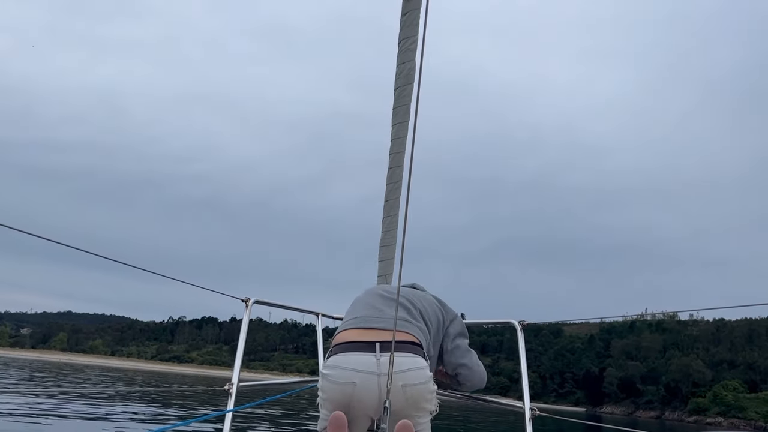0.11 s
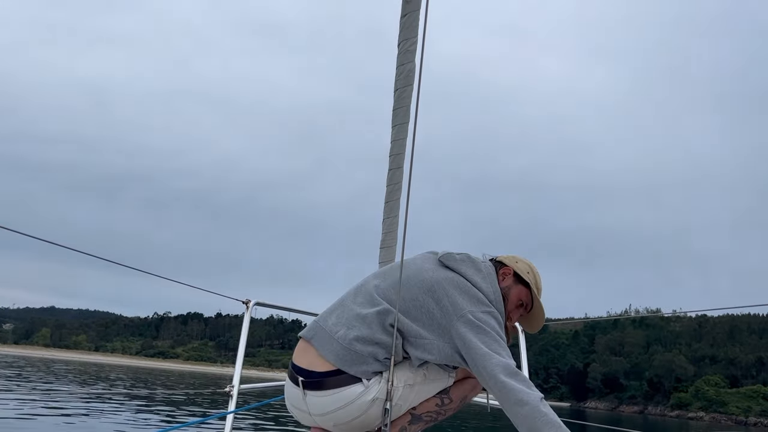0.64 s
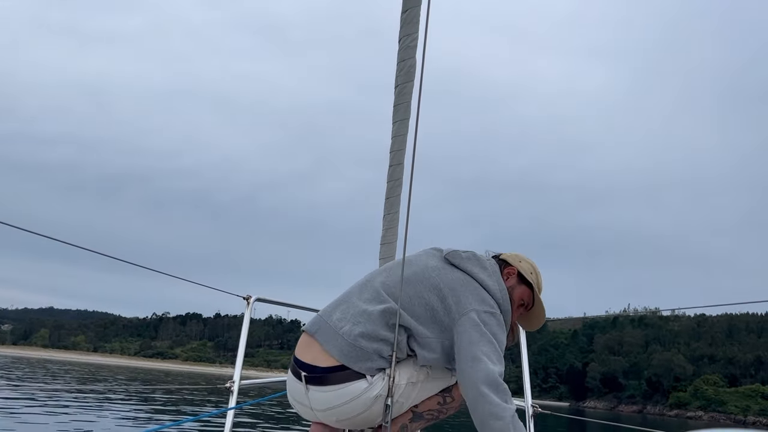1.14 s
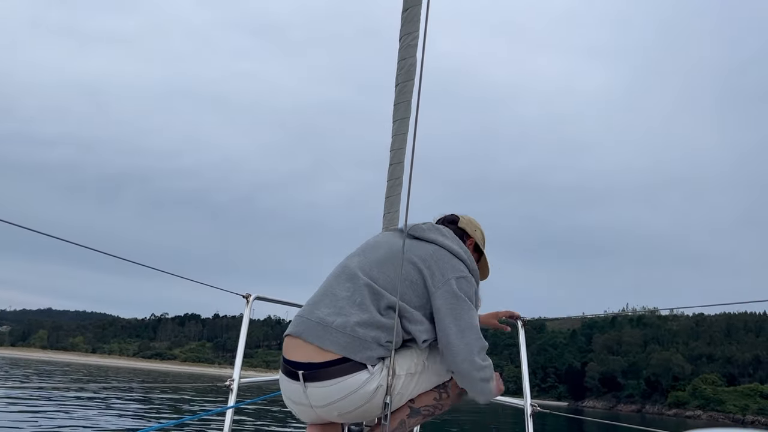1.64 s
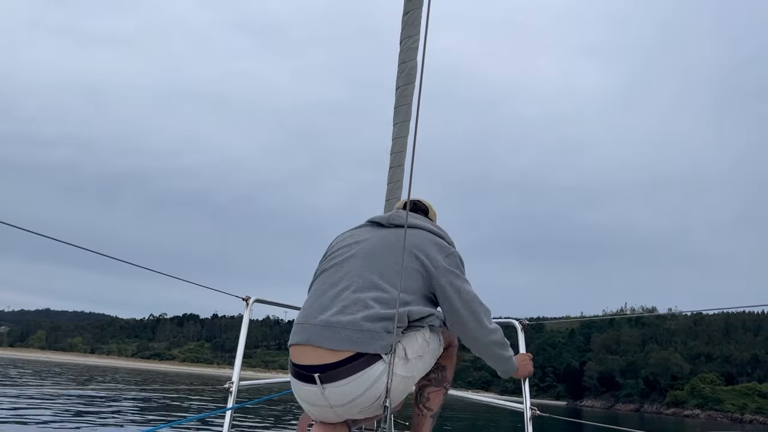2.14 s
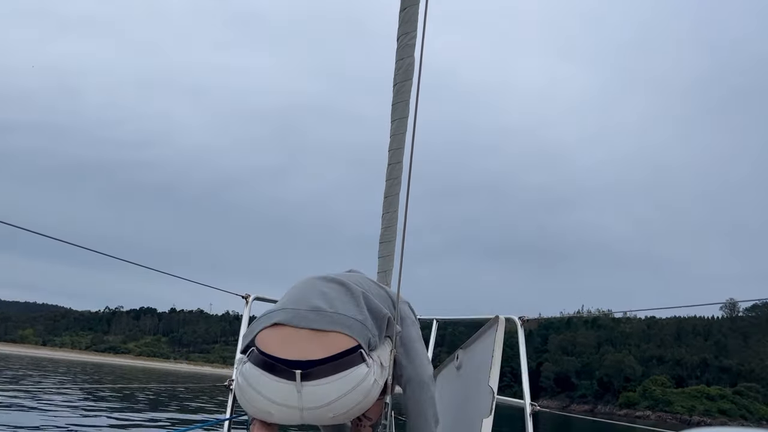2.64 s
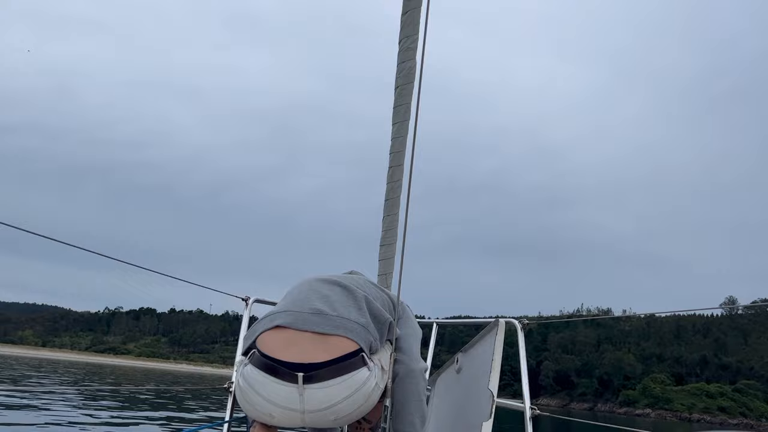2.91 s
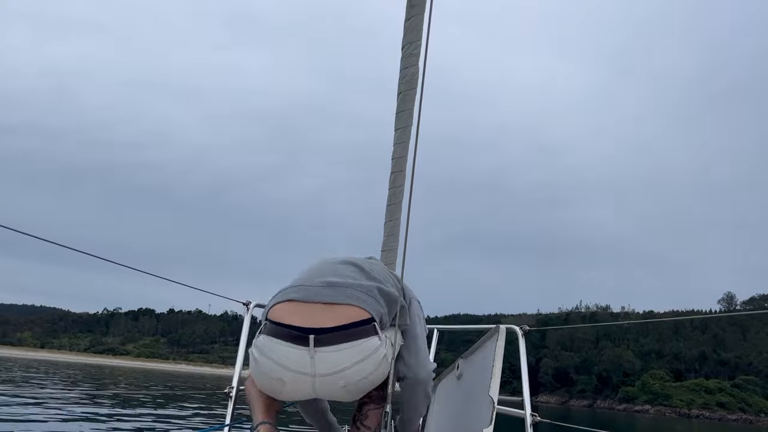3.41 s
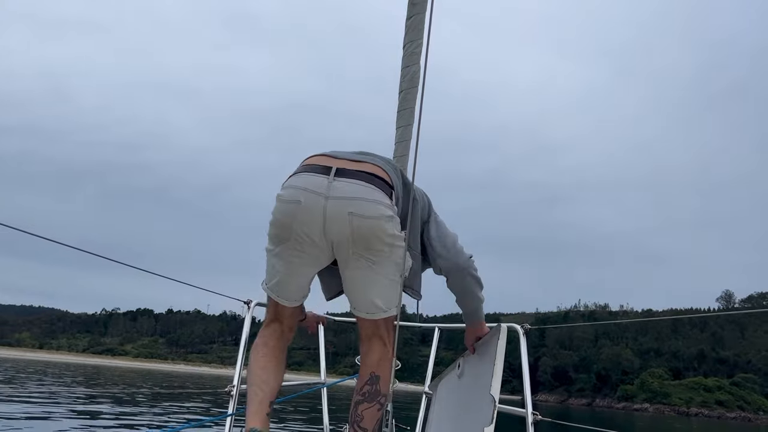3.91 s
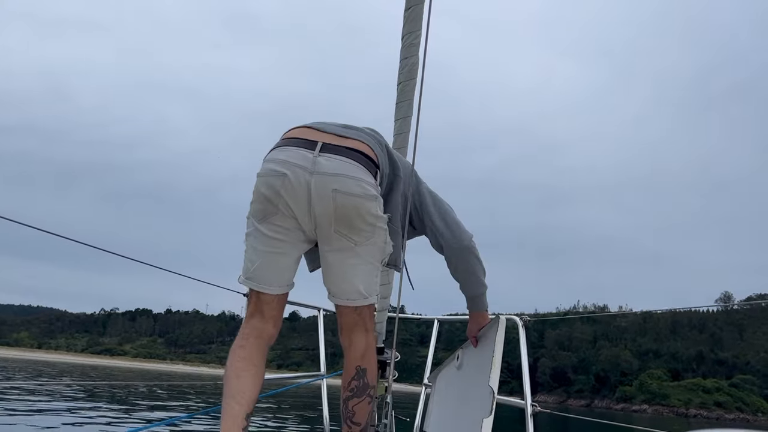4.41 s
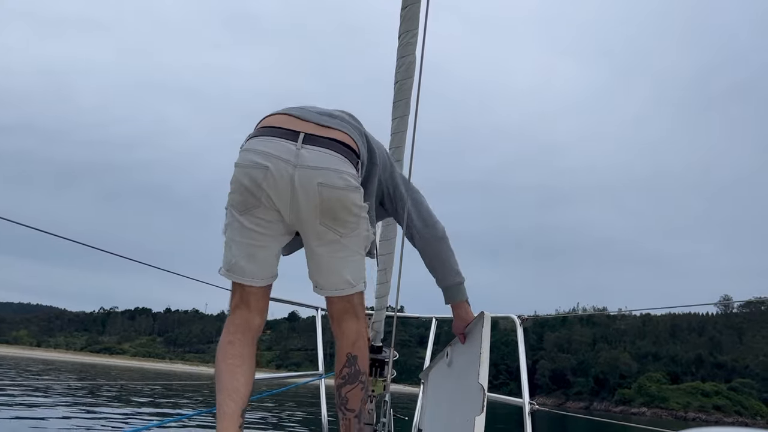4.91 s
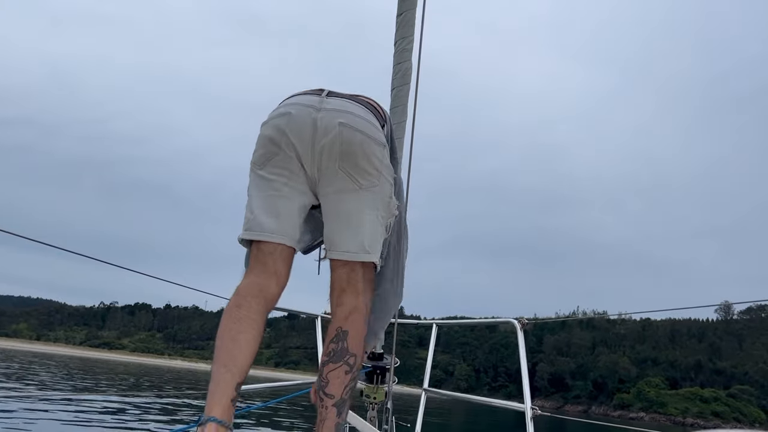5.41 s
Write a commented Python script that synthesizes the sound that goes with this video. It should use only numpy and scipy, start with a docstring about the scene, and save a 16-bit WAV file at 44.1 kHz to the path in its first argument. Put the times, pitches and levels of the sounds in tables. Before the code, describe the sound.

Quiet deck creaks and small knocks, then a loud rattling hatch bang, a sharp slap, hinge clicks and final dull bumps over low hull rumble.

```python
"""Locker hatch on a foredeck

On the foredeck of a boat at a calm anchorage someone shifts about and opens a locker hatch.
Close by, the hatch bangs and rattles, a rail rings, a hinge clicks and scrapes: rough contacts on decaying
modes. The deck knocks and creaks; gear ticks, scuffs and slaps in bursts of noise; faint tones squeak and hum.
Cloth rustles near the microphone, with a faint bright tick; around lie hull rumble, murmur and wash of shaped
noise. A faint bird on the shore is gliding whistles."""
import sys
import numpy as np
from scipy import signal
from scipy.fft import rfft, irfft
from scipy.io import wavfile
from scipy.ndimage import uniform_filter1d

SR = 44100
rng = np.random.default_rng(int(sys.argv[2]) if len(sys.argv) > 2 else 0)


def ratio_of_db(decibels):
    """Turn decibels (scalar or array-like) into linear amplitude factors; 0 dB maps to 1."""
    return 10 ** (np.asarray(decibels, float) / 20)


def inscribe(sig):
    """Save sig as 16-bit PCM at rate SR to the path in sys.argv[1].

    A 1-D sig is mono; a 2-D sig holds one channel per row.
    Samples are clipped to [-1, 1] before scaling.
    """
    pcm = np.round(np.clip(np.atleast_2d(sig).T, -1, 1) * 32767)
    wavfile.write(sys.argv[1], SR, pcm.astype(np.int16))


N = 244304
CLOCK = np.arange(N) / SR  # s

# modes of the locker hatch: f/Hz, level/dB, t60/s
HATCH_MODES = [(147, -13, 0.088), (239, -3, 0.055), (297, -5.5, 0.049), (380, -0.5, 0.046), (409, 1, 0.077),
               (510, -0.5, 0.044), (667, -3.5, 0.081), (774, 1, 0.031), (907, -2, 0.038), (1002, 2, 0.023),
               (1360, -0.5, 0.019), (1620, -8.5, 0.038), (2010, -15, 0.041)]
# phase between the two microphone ports for sound from around: f/Hz, lead of left/rad
AROUND_LEAD = [(0, 0), (260, -.2), (1120, 3.8), (2410, 5.8), (2930, 4.5), (5860, 6.7), (7580, 6.3),
               (11600, 12.3), (16700, 19.1)]


def colour(x, points):
    """Filter by a spectrum given as (f/Hz, level/dB) points, joined over log frequency."""
    hz, db = np.transpose(points)
    bins = np.log(np.maximum(np.fft.rfftfreq(x.shape[-1], 1 / SR), 1))
    return irfft(rfft(x) * ratio_of_db(np.interp(bins, np.log(hz), db)), x.shape[-1])


def band(x, lo_hz, hi_hz, order=3):
    """Band-pass scaled to a peak of 1."""
    y = signal.sosfilt(signal.butter(order, [lo_hz, hi_hz], "bandpass", fs=SR, output="sos"), x)
    return y / np.abs(y).max()


def unit(x):
    """Scale to an rms of 1."""
    return x / np.sqrt(np.mean(x ** 2))


def curve(s, db):
    """Gain over time from dB points."""
    return ratio_of_db(np.interp(CLOCK, s, db))


def walk(rate):
    """Random levels held 1 / rate s and slewed twice; spread near 1."""
    hold = int(SR / rate)
    steps = np.repeat(rng.standard_normal(N // hold + 1), hold)
    return 1.3 * uniform_filter1d(uniform_filter1d(steps, hold), hold)[:N]


def ports(x, lead):
    """Turn the phase between the two ports of the microphone, half at each."""
    hz, rad = np.transpose(lead)
    turn = np.exp(.5j * np.interp(np.fft.rfftfreq(N, 1 / SR), hz, rad))
    return irfft(rfft(x) * np.array([turn, turn.conj()]), N)


def around(points):
    """Coloured noise from all sides: one share common to both ports, one unrelated."""
    # share unrelated left and right: f/Hz, level/dB
    spread = [(60, -20.5), (150, 0.5), (400, -0.5), (1000, 7), (3000, -0.5), (8000, 2.5), (15000, -20.5)]
    common = ports(rng.standard_normal(N), AROUND_LEAD)
    unrelated = colour(rng.standard_normal((2, N)), spread)
    return unit(colour(common + unrelated, points))


def add(out, s, sound):
    """Place one sound at its time."""
    i = int(s * SR)
    piece = sound[:N - i]
    out[i:i + len(piece)] += piece


def burst(rise_ms, t60, length=.4):
    """White noise that swells and dies away."""
    t = np.arange(int(length * SR)) / SR
    swell = np.minimum(t / (max(rise_ms, .1) / 1000), 1) ** 2
    fall = np.exp(-np.log(1000) * np.maximum(t - rise_ms / 1000, 0) / max(t60, .004))
    return rng.standard_normal(len(t)) * swell * fall


def strike(modes, contact, swell_ms, scatter_db, detune=0.0086, turns=0):
    """A contact rings the modes, which take a moment to swell; each blow varies them. Peak 1."""
    hz, db, t60 = np.transpose(modes)[:, :, None]
    t = np.arange(int(.3 * SR)) / SR
    chance = rng.standard_normal((3, len(hz), 1))  # level, pitch, phase
    phase = 2 * np.pi * (hz * (1 + detune * chance[1]) * t + chance[2])
    ring = ratio_of_db(db + scatter_db * chance[0]) * np.sin(phase)
    ring = ring * np.exp(-np.log(1000) * t / np.maximum(t60, .005))
    swell_s = swell_ms / 1000 + turns / hz
    ring = (ring * (1 - np.exp(-(t / swell_s) ** 2))).sum(axis=0)
    # a yielding contact holds little treble
    soft = signal.sosfilt(signal.butter(2, 0.74 * hz.max(), fs=SR, output="sos"), contact)
    y = signal.fftconvolve(ring, soft)
    return y / np.abs(y).max()


def whistles(notes, fade_db, waver_db):
    """Near-sine notes that glide, arch in the middle and fade."""
    out = np.zeros(N)
    for s, length, from_hz, to_hz, arch_hz, db in notes:
        u = np.arange(int(length * SR)) / SR / length  # 0 to 1 through the note
        edge = np.clip(np.minimum(u, 1 - u) * length / 0.009, 0, 1)
        hz = from_hz + (to_hz - from_hz) * u + arch_hz * np.sin(np.pi * u)
        level = np.sqrt(2) * ratio_of_db(db + fade_db * u) * edge
        add(out, s, level * np.sin(2 * np.pi * np.cumsum(hz) / SR))
    return out * ratio_of_db(waver_db * walk(49))


def crack(db, treble_db, low_db, rise_ms, t60, mid_hz, treble_hz=(7000, 12000)):
    """A broad noise burst in three bands; treble and low are relative to the middle one."""
    x = burst(rise_ms, t60)
    treble = ratio_of_db(treble_db) * band(x, *treble_hz, order=2)
    low = ratio_of_db(low_db) * band(x, 260, 1000)
    return ratio_of_db(db) * (band(x, *mid_hz) + treble + low)


def hull():
    """The rumble is noise in a few low hull resonances, nearly alike at both ports."""
    # resonances: f/Hz, width/Hz, level/dB
    resonances = [(69, 24.5, -0.5), (111, 90, -11)]
    hz = np.fft.rfftfreq(N, 1 / SR)
    shape = sum(ratio_of_db(db) / (1 + ((hz - centre) / (width / 2)) ** 2) for centre, width, db in resonances)
    noise = rng.standard_normal(N) + 0.17 * rng.standard_normal((2, N))
    return unit(irfft(rfft(noise) * shape, N))


def thuds():
    """Gain that each heavy thud adds to the hull rumble: a quick swell, a slow fall."""
    # thuds at their fullest: t/s, level/dB, t60/s
    heavy = [(0.24, -41.5, 0.34), (2.048, -31.5, 0.6), (2.249, -40.5, 0.32), (2.522, -35, 0.3),
             (3.099, -34, 0.36), (5.18, -44.5, 0.93)]
    rise_s = 0.056
    gain = np.zeros(N)
    for s, db, t60 in heavy:
        swell = np.clip((CLOCK - s) / rise_s + 1, 0, 1)
        gain += ratio_of_db(db) * swell * np.exp(-np.log(1000) * np.maximum(CLOCK - s, 0) / t60)
    return gain


def anchorage():
    """Hull rumble with its thuds, a wavering deck murmur and a soft outdoor wash, all shaped noise."""
    # course of the background: t/s, murmur level/dB, wash level before its lift/dB, rumble level/dB
    course = [(0.0, -54, -56.5, -44.5), (0.62, -53.5, -59, -43.5), (1.16, -50.5, -53.5, -45.5),
              (1.56, -53.5, -57, -44), (2.5, -51, -54, -45.5), (2.849, -55, -63, -50.5),
              (4.0, -55.5, -60.5, -48), (4.9, -54, -61, -52), (5.54, -53, -60.5, -46)]
    # spectrum of the deck murmur: f/Hz, level/dB per Hz
    murmur_spectrum = [(80, -16), (120, -5), (190, 0.5), (300, -9), (500, -26), (800, -51.5)]
    # spectrum of the outdoor wash: f/Hz, level/dB per Hz
    wash_spectrum = [(150, -40.5), (250, -5), (360, -6.5), (795, -12.5), (3120, -35.5), (4650, -47),
                     (16000, -63)]
    s, murmur_db, wash_db, rumble_db = np.transpose(course)
    rumble = hull() * (curve(s, rumble_db) + thuds())
    murmur = around(murmur_spectrum) * curve(s, murmur_db) * ratio_of_db(3.9 * walk(22))
    wash_lift = ratio_of_db(0.26 * walk(2.1) + 4.5)
    wash = around(wash_spectrum) * curve(s, wash_db) * wash_lift
    return rumble + murmur + wash


def bird():
    """Thin gliding whistles from the shore, blurred by echoes over the water."""
    # notes: start t/s, length/s, first f/Hz, last f/Hz, arch/Hz, level at the start before wavering/dB
    notes = [(.994, .048, 4050, 3600, 800, -65), (1.045, .1, 3400, 3400, 50, -70),
             (1.21, .045, 4200, 3600, 520, -67), (1.256, .048, 3300, 3450, -80, -65),
             (2.815, .055, 3770, 3680, 0, -83), (2.895, .135, 4280, 3990, 0, -83),
             (3.3, .097, 4180, 4350, -470, -81), (3.39, .075, 4360, 4480, 0, -79),
             (3.75, .13, 3450, 3300, 0, -83)]
    song = whistles(notes, fade_db=-5.5, waver_db=2.5)
    blur = signal.fftconvolve(song, unit(burst(4, .15, 0.18)))[:N]
    return ports(song + ratio_of_db(-50) * blur, AROUND_LEAD)


def cloth():
    """Swishes of cloth near the microphone, and a faint bright tick: uneven noise that swells and fades."""
    # swishes of cloth, and a faint bright tick at 4.741 s: middle t/s, level/dB, half length/s
    rustle = [(0.1, -69, 0.015), (0.344, -66, 0.074), (0.573, -74, 0.089), (0.852, -64.5, 0.12),
              (0.966, -61, 0.028), (1.044, -60, 0.018), (1.311, -57, 0.034), (1.435, -58.5, 0.067),
              (1.64, -66.5, 0.071), (1.978, -62, 0.059), (2.07, -56, 0.053), (2.187, -39, 0.012),
              (2.238, -57, 0.032), (3.558, -62, 0.082), (3.756, -63, 0.049), (3.931, -56.5, 0.044),
              (4.065, -50.5, 0.027), (4.646, -61, 0.0075), (4.741, -55, 0.0085), (5.124, -60.5, 0.058)]
    # spectrum of the noise: f/Hz, level/dB per Hz
    fabric = [(1000, 0), (2000, 1.5), (3500, -5), (6000, -11), (8500, -15), (11500, -4.5), (14000, -8.5),
              (16000, -7)]
    swells = sum(ratio_of_db(db) * np.exp(-.5 * np.abs((CLOCK - s) / half) ** 2.6) for s, db, half in rustle)
    bed = ratio_of_db(-91.5)
    return around(fabric) * ratio_of_db(1.3 * walk(120)) * (swells + bed)


def squeaks():
    """The faint squeak of a sole and hum of a fitting are wavering, fading tones."""
    # tones: start t/s, length/s, first f/Hz, last f/Hz, arch/Hz, level at the start before wavering/dB
    tones = [(1.465, 0.039, 1470, 1850, 0, -65), (4.565, 0.19, 770, 774, 0, -63.5)]
    return whistles(tones, fade_db=-12.0, waver_db=6.5)


def deck(out):
    """Knees, feet and gear bump the deck, which answers with short hollow notes, creaks and groans."""
    # dull knocks: t/s, peak/dB, main pitch f/Hz
    knocks = [(0.163, -39.5, 326), (0.205, -36.5, 316), (0.235, -32, 130), (1.225, -32, 196),
              (2.017, -32, 332), (2.042, -23, 134.5), (2.093, -30, 122), (3.08, -18.5, 417),
              (3.507, -32.5, 253.4), (3.536, -33.5, 357), (5.207, -28.5, 346), (5.244, -36.5, 131.6),
              (5.307, -31.5, 331), (5.364, -39, 162.5)]
    # modes of the deck: ratio to the main pitch, level/dB, t60/s
    deck_modes = [(0.549, -7, 0.04), (1.002, 1.5, 0.038), (1.201, -11, 0.021), (1.8, -6, 0.035),
                  (2.9, -22, 0.021)]
    # creaks under shifting weight, slip by slip: t/s, peak/dB
    creaks = [(1.025, -31), (1.163, -31.5), (1.189, -28.5), (1.215, -28.5), (1.238, -50), (1.266, -34),
              (1.299, -26.5), (1.323, -38), (1.367, -33.5), (1.381, -30.5)]
    # groans while weight rolls over: start t/s, length/s, peak/dB
    groans = [(.925, 0.152, -34), (1.155, 0.29, -42.5)]
    # dull shuffles of feet: t/s, peak/dB, rise/ms
    shuffles = [(1.73, -38, 24), (2.14, -26, 9.9), (2.157, -29.5, 11)]
    slips = [(s, db, 326 * (1 + 0.023 * rng.standard_normal())) for s, db in creaks]
    # a slip is soft and rings the lowest modes only
    for blows, body in ((knocks, deck_modes), (slips, deck_modes[:3])):
        for s, db, hz in blows:
            modes = [(ratio * hz, mode_db, t60) for ratio, mode_db, t60 in body]
            # the push lasts half a period of the note, the swell about one
            push = np.hanning(int(SR / hz / 2))
            add(out, s, ratio_of_db(db) * strike(modes, push, 1100 / hz, 0.69))
    for s, length, db in groans:
        rub = rng.standard_normal(N)[:int(length * SR)]
        # silence after the rub lets the band ring out
        rub_and_rest = np.r_[rub * np.hanning(len(rub)) ** .5, 0 * rub]
        add(out, s, ratio_of_db(db) * band(rub_and_rest, 200, 462, order=2))
    for s, db, rise_ms in shuffles:
        add(out, s, ratio_of_db(db) * band(burst(rise_ms, t60=0.066), 200, 610, order=2))


def gear(out):
    """Hard ticks, short scuffs, one longer-tailed tick and one sharp slap are noise bursts, bright or dull."""
    # ticks: t/s, peak of the middle band/dB, treble/dB, low/dB
    ticks = [(0.64, -45, -36, 13), (0.991, -53, 0, -4), (1.378, -54, -6, 22), (2, -47, -7, 8),
             (2.018, -40, -3, 7.5), (2.031, -31, 2.5, -2.5), (2.431, -45, -21, -4),
             (3.4965, -26.5, -44, -4), (3.659, -48, -25, 0), (5.112, -41, -27, -5), (5.205, -48, -20, 14),
             (5.223, -32, -14, -12)]
    # scuffs, and one hard tick with a longer tail (5.408 s): t/s, peak of the middle band/dB, treble/dB,
    # low/dB, rise/ms
    scuffs_and_tick = [(2.175, -29, -15, -0.5, 6.4), (3.037, -48, -40, 7.5, 14), (3.698, -52, -8, -27, 12),
                       (5.129, -46, -17, -1, 46), (5.408, -33, -10.5, -1, 0.72)]
    # slap in its touch, crack and tail: t from the crack/ms, peak of the middle band/dB, treble/dB,
    # low/dB, t60/s
    slap = [(-6.5, -18, -7, -1.5, 0.039), (-0.55, -10, 8, -14.5, 0.016), (1.5, -19.5, -3, -9.5, 0.12)]
    slap_s = 3.0732
    for s, db, treble_db, low_db in ticks:
        add(out, s, crack(db, treble_db, low_db, rise_ms=1.47, t60=0.018, mid_hz=(1450, 3100)))
    for s, db, treble_db, low_db, rise_ms in scuffs_and_tick:
        add(out, s, crack(db, treble_db, low_db, rise_ms, t60=0.075, mid_hz=(1500, 3200)))
    for ms, db, treble_db, low_db, t60 in slap:
        piece = crack(db, treble_db, low_db, 1.2, t60, mid_hz=(1700, 4600), treble_hz=(5000, 15000))
        add(out, slap_s + ms / 1000, piece)


def hinge(out):
    """The hinge sticks and lets go in short creaking clicks, and scrapes in between."""
    # clicks: t/s, peak of the upper modes/dB, low modes/dB, crack/dB (both relative)
    clicks = [(0.194, -35, -7, -24), (4.2283, -39.5, 1.5, -16), (4.2437, -34, -7.5, -23),
              (4.3184, -39, -10.5, -18), (4.4468, -48.5, -3, -16), (4.4867, -34.5, 1.5, -12.5),
              (4.5303, -38, -10, -27), (4.5449, -37.5, -10, -22), (4.553, -32, 0, -27),
              (4.7365, -44, 2.5, -3), (4.76, -34.5, -6, -0.5), (4.766, -26.5, -11, -19),
              (4.7873, -51, 6, -3), (4.832, -32, -4, -19), (4.8469, -40, 9.5, -12), (4.8546, -32.5, 5, -25),
              (4.863, -48, 8, -23)]
    # modes of the hinge: f/Hz, level/dB, t60/s
    hinge_modes = [(634, -5.5, 0.043), (756, 0.5, 0.022), (968, 2, 0.018), (1590, -2.5, 0.024),
                   (1758, 10.5, 0.017), (2360, -7.5, 0.01)]
    # scrapes: start t/s, length/s, peak of the rough rub/dB
    scrapes = [(3.299, 0.053, -50), (4.249, 0.037, -55), (4.444, 0.12, -50), (4.745, 0.14, -47.5)]
    for s, db, low_db, crack_db in clicks:
        contact = burst(3.29, 0.0087, .05)
        add(out, s, ratio_of_db(db) * strike(hinge_modes[3:], contact, 1.5, 1.8, detune=0.029))
        add(out, s, ratio_of_db(db + low_db) * strike(hinge_modes[:3], contact, 0.66, 2.1, detune=0.054))
        add(out, s, ratio_of_db(db - 8) * band(contact, 600, 2200, order=4))  # grit
        add(out, s, ratio_of_db(db + crack_db) * band(burst(2.4, 0.042, .1), 1500, 3860))
    for s, length, db in scrapes:
        rub = rng.standard_normal(N)[:int(length * SR)]
        swell = np.hanning(len(rub))
        add(out, s, ratio_of_db(db - 5) * strike(hinge_modes, rub * swell ** .5, 0.6, 2.9))
        uneven = ratio_of_db(3.8 * walk(130)[:len(rub)])
        add(out, s, ratio_of_db(db) * band(rub * swell * uneven, 600, 2500, order=3))


def rail(out):
    """The steel tube rings, a little unevenly, until it is damped; its upper modes buzz against the hatch."""
    # modes of the rail: f/Hz, level/dB, t60/s
    rail_modes = [(1247.6, 0, 0.26), (2570, 2, 0.1), (3740, -10.5, 0.13)]
    # blows that ring it until the hatch rests on it again: t/s, main mode before unevenness/dB, free/s,
    # upper modes before buzzing, relative to the main one/dB
    hits = [(2.532, -19, .043, -26), (2.601, -27, .054, -14)]
    damped_t60_s = 0.023
    for s, db, free_s, upper_db in hits:
        contact = burst(1.4, 0.0037, .1)
        ring = strike(rail_modes[:1], contact, 4.0, 0, detune=0.002)
        held = np.maximum(np.arange(len(ring)) / SR - free_s, 0)
        ring_db = db - 60 * held / damped_t60_s + 3.5 * walk(110)[:len(ring)]
        add(out, s, ratio_of_db(ring_db) * ring)
        buzz = strike(rail_modes[1:], contact, 3.7, 1.1, detune=0.005)
        add(out, s, ratio_of_db(db + upper_db + 6 * walk(160)[:len(buzz)]) * buzz)


def rattle(out):
    """Loose latch and hatch chatter after the first blow: dense uneven taps shake the hatch modes."""
    start_s, rise_s, fall_s = 2.482, .012, .36  # fall_s: 60 dB down
    since = CLOCK - start_s
    swell = np.clip(since / rise_s, 0, 1)
    taps = rng.standard_normal(N) * ratio_of_db(4.5 * walk(350)) * swell * ratio_of_db(-28 - 60 * (since / fall_s) ** 2)
    t = np.arange(int(.1 * SR)) / SR
    body = sum(ratio_of_db(db - 60 * t / t60) * np.sin(2 * np.pi * hz * t) for hz, db, t60 in HATCH_MODES)
    shaken = signal.fftconvolve(taps, body / np.sqrt(np.sum(body ** 2)))[:N]
    clatter = ratio_of_db(4) * colour(taps, [(700, -19.5), (1500, 1.5), (3500, -7), (8000, -28)])
    add(out, 0, shaken + clatter)


def hatch(out):
    """The locker hatch swings against the rail and bangs: modes, a rough clatter and a crack."""
    # blows: t/s, peak of the modes/dB, crack relative to them/dB
    bangs = [(2.4799, -17.5, -15), (2.4847, -6.5, -16.5), (2.493, -5.5, -30.5), (2.5137, -6, -10.5),
             (2.525, -11, -18), (2.535, -19.5, 0), (2.575, -11.5, -18.5), (2.601, -19, -13)]
    for s, db, crack_db in bangs:
        contact = burst(1.4, 0.0037, .1)
        # turns=1: low modes swell more slowly, by one period each
        add(out, s, ratio_of_db(db) * strike(HATCH_MODES, contact, 0.81, 2.9, detune=0.029, turns=1))
        add(out, s, ratio_of_db(db - 9) * band(burst(1.9, 0.034), 330, 1200, order=2))
        add(out, s, ratio_of_db(db + crack_db) * band(burst(2.4, 0.034), 1400, 3300, order=2))


def deck_echoes(x):
    """Deck, coachroof and rig scatter each hit differently into each port: decaying coloured noise."""
    tone = [(70, -20), (250, -5.5), (800, -5.0), (4000, -10), (9000, -27.5)]
    tails = np.array([unit(colour(burst(4.6, 0.12, 0.5), tone)) for _ in range(2)])
    return ratio_of_db(-53.0) * signal.fftconvolve(x[None], tails, axes=1)[:, :N]


def treble_echoes(x):
    """Treble echoes come from the side of the blow, so both ports share them."""
    tail = unit(colour(burst(8.9, 0.11, 0.37), [(2000, -21.5), (6000, 1.5), (15000, -8.5)]))
    return ratio_of_db(-56.5) * signal.fftconvolve(x, tail)[:N]


def scene():
    """Struck things nearby, answered by early echoes, over the background."""
    # phase between the microphone ports for near sound: f/Hz, lead of left/rad
    near_lead = [(0, 0), (520, .3), (1290, -.9), (1890, -.1), (4300, -1.3), (5900, 1.2), (6450, -.6),
                 (8350, 1.9), (9900, 3.4), (10500, 5.6), (12400, 7.2), (14700, 9.8), (15500, 12.3),
                 (16700, 13)]
    near = squeaks()
    for source in (deck, gear, rattle, hatch):
        source(near)
    clicks = np.zeros(N)  # hinge and rail sound drier than the other hits
    hinge(clicks)
    rail(clicks)
    pan = ratio_of_db(np.array([[-0.75], [0.75]]))  # left, right
    direct = ports(near + clicks + treble_echoes(near), near_lead) * pan
    wet = deck_echoes(near + ratio_of_db(-14) * clicks)
    return anchorage() + bird() + cloth() + wet + direct


def top_cut(x):
    """Nothing passes above the cut-off."""
    return signal.sosfilt(signal.butter(12, 17150, fs=SR, output="sos"), x)


def record(dry):
    """The microphone cuts the deepest bass and the very top."""
    mix = colour(dry, [(20, -16.5), (45, 1.0), (15900, -3.0), (16500, -27.5)])
    return top_cut(mix)


dry = scene()
out = record(dry)
inscribe(out)
```